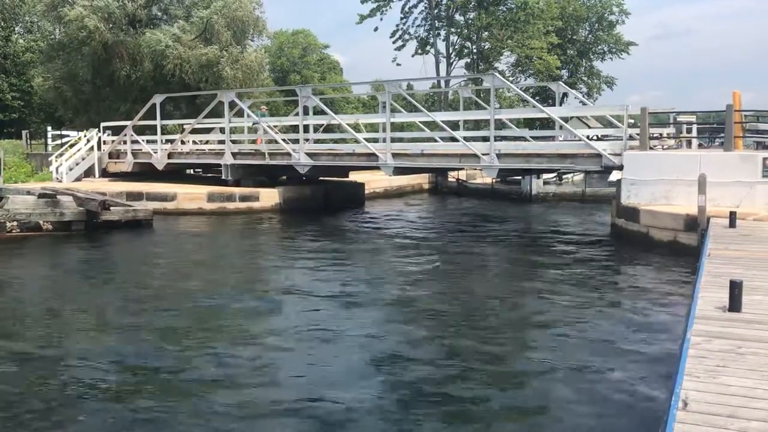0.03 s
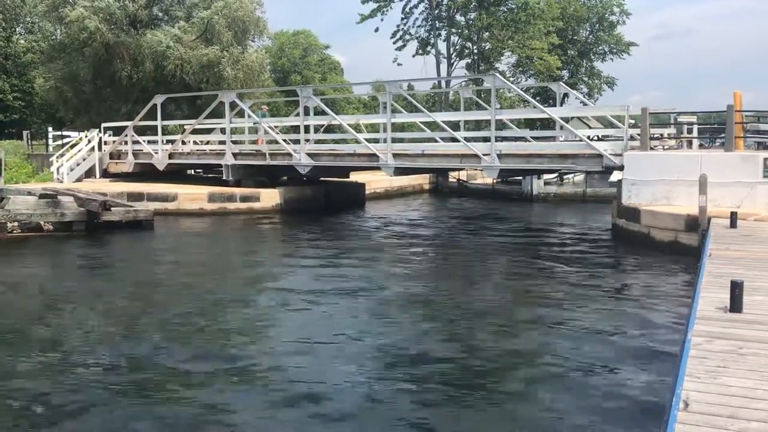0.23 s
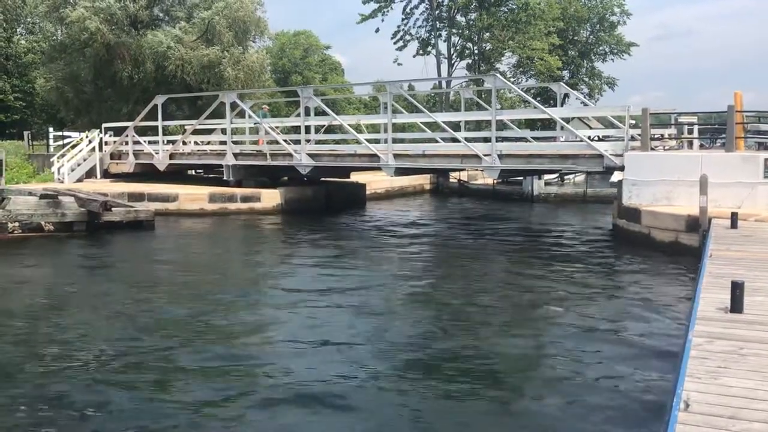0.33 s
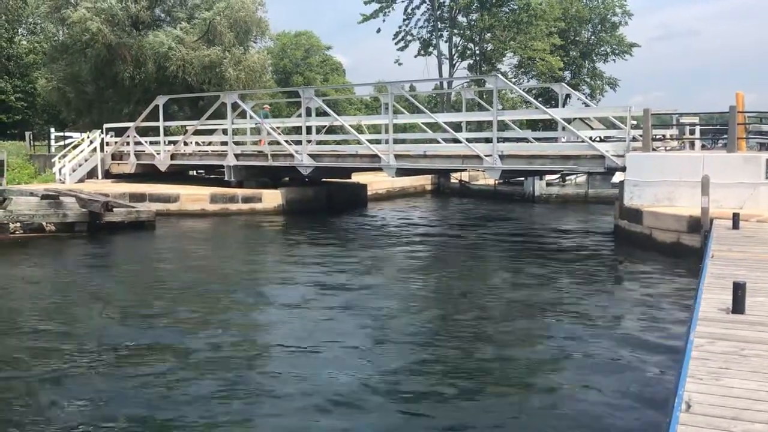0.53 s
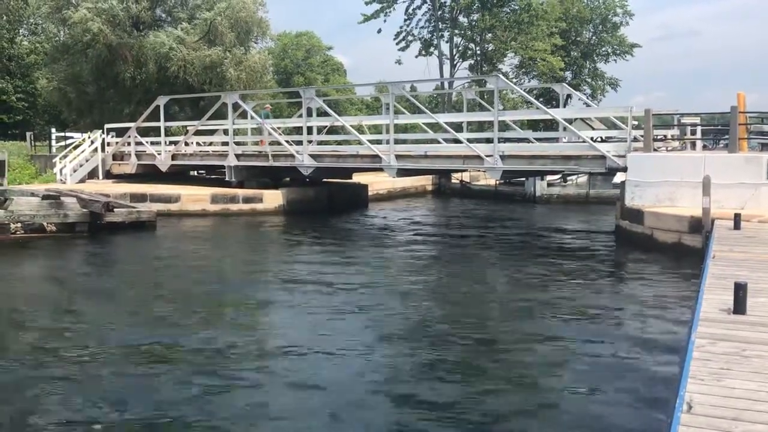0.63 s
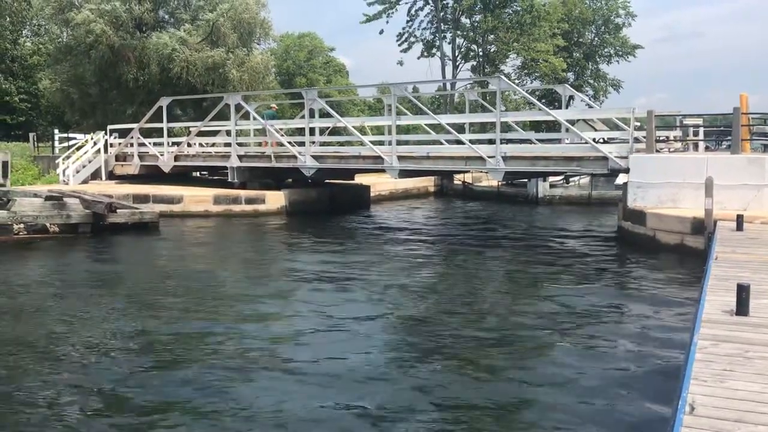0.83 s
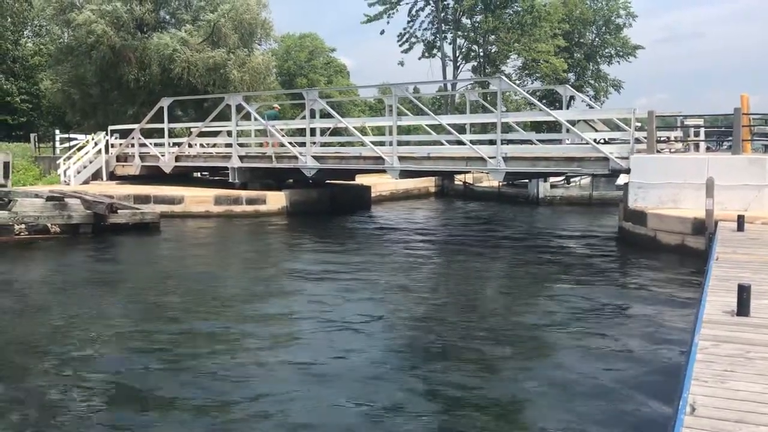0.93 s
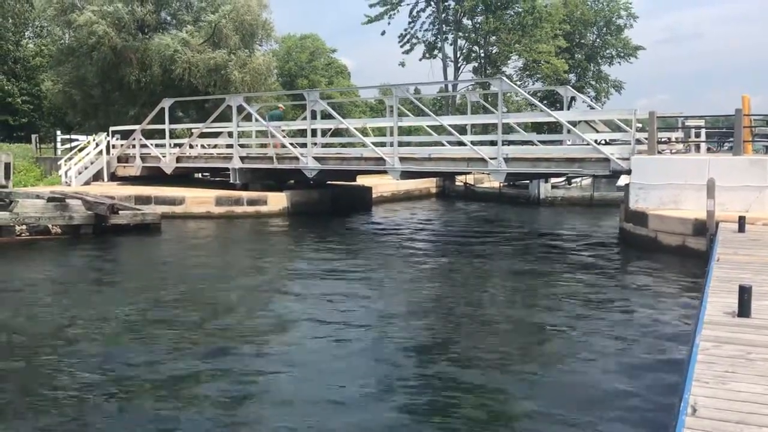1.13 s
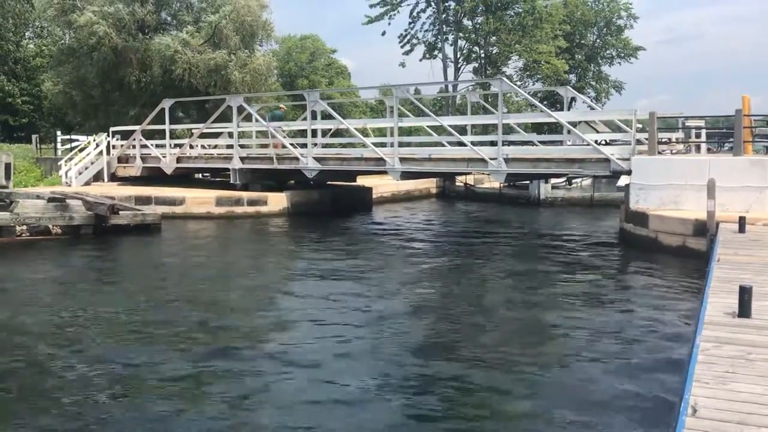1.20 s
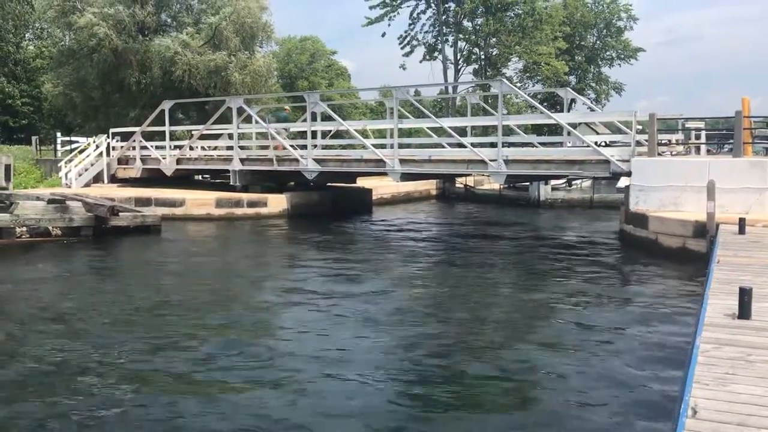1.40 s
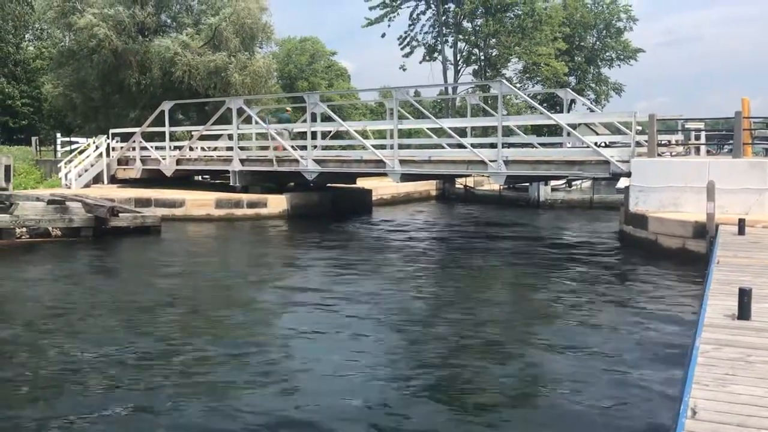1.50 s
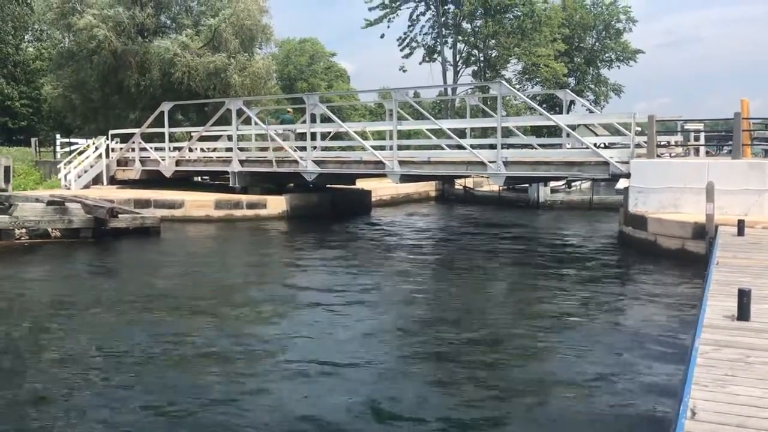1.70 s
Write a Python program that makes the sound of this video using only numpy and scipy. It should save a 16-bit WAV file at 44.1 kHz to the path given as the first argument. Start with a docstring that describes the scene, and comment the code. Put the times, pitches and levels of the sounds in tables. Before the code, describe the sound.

Steel bangs twice outdoors, ringing briefly, before far-off knocks and faint clinks.

```python
"""Bangs at a steel swing bridge

A small tap leads into a loud bang and a lighter, brighter rebound: each blow makes the steel ring at
many pitches at once (its "modes"). Two dull, distant knocks follow. Close by, a small metal piece
clinks, and something squeaks and ticks faintly. Light wind bumps the microphone over quiet open air."""
import sys
import numpy as np
from scipy import signal
from scipy.fft import irfft
from scipy.io import wavfile

SR = 44100
rng = np.random.default_rng(int(sys.argv[2]) if len(sys.argv) > 2 else 0)


def waveform_to_disk(signal):
    """Save audio, clipped to [-1, 1], as 16-bit WAV at the path in sys.argv[1]."""
    frames = np.transpose(np.atleast_2d(signal))
    scaled = np.clip(frames, -1, 1) * 32767
    samples = np.round(scaled).astype(np.int16)
    wavfile.write(sys.argv[1], SR, samples)


N = 77175
TIME = np.arange(N) / SR
FREQ = np.maximum(np.arange(N // 2 + 1) * SR / N, 1)

# The steel's dense ringing; t60 is the time a sound takes to fade by 60 dB.
# f/Hz, bang level/dB per Hz, rebound level/dB per Hz, t60/s
STEEL = [(90, -68, -85, 1.1), (165, -49, -68, 1.3), (260, -56, -71, 1.5), (440, -55, -74, .9),
         (620, -55, -69, .72), (780, -55, -66, .75), (1050, -50, -62, .7), (1450, -51, -58, .68),
         (1750, -51, -56, .5), (2150, -51, -53, .36), (2700, -56, -60, .34), (3400, -52, -59, .33),
         (5200, -63, -61, .28), (8500, -68, -68, .2), (11000, -74, -85, .19), (13000, -71, -86, .2),
         (16000, -80, -97, .19)]
BANG_COLUMN, REBOUND_COLUMN, T60_COLUMN = 1, 2, 3


def from_db(db):
    """Turn decibels into a factor to multiply by."""
    return 10 ** (np.asarray(db) / 20)


def rms_one(x):
    """Scale a signal so that its average strength (rms) is 1."""
    return x / np.sqrt(np.mean(x ** 2) + 1e-20)


def at_hz(table, hz, column=1):
    """Read a table at any pitch, blending between its rows."""
    table = np.array(table)
    return np.interp(np.log(hz), np.log(table[:, 0]), table[:, column])


def random_spectrum(gain):
    """Give each frequency its strength (gain, per root Hz) and a random phase."""
    return gain * np.exp(2j * np.pi * rng.random(len(FREQ))) * np.sqrt(N * SR / 2)


def noise(gain):
    """Noise whose tone is shaped by a gain for each frequency."""
    return irfft(random_spectrum(gain), N)


def narrow_noise(hz, width_hz):
    """Noise gathered around one pitch, with rms 1."""
    return rms_one(noise(1 / (1 + (2 * (FREQ - hz) / width_hz) ** 4)))


def keep_side(x, hz, side):
    """A gentle filter that keeps the "low" or the "high" side of a frequency."""
    return signal.sosfilt(signal.butter(2, hz, side, fs=SR, output="sos"), x + 1e-18)


def decay(start, t60):
    """Jump to 1 at the start time, then fade away."""
    out, first = np.zeros(N), int(start * SR)
    age = TIME[:min(N - first, int(2 * t60 * SR))]
    out[first:first + len(age)] = 1000 ** (-age / t60)
    return out


def rise(start, rise_s):
    """Climb smoothly from 0 towards 1."""
    return 1 - np.exp(-np.maximum(TIME - start, 0) / rise_s)


def swell(start, length):
    """Go up and back down in one rounded hump."""
    return np.sin(np.pi * np.clip((TIME - start) / length, 0, 1))


def mode(start, hz, t60):
    """One pure tone of struck metal, fading away."""
    age = TIME - int(start * SR) / SR
    return np.sin(2 * np.pi * (hz * age + rng.random())) * decay(start, t60)


def steel_blow(blow, bands, column):
    """One blow rings the steel's strong modes and the dense ones between them."""
    # The strongest modes: f/Hz, bang level/dB, rebound level/dB, t60/s
    strong_modes = [(595, -34, -50, .55), (998, -20, -44, .27), (1028, -16, -46, .09),
                    (1053, -21, -46, .25), (1129, -31, -44, .55), (1175, -33, -40, .8),
                    (1277, -28, -46, .45), (1402, -25, -43, .45), (1505, -28, -46, .45),
                    (1613, -35, -38, .6), (2038, -26, -31, .25), (2105, -34, -19, .14),
                    (2168, -27, -38, .26), (2226, -18, -38, .26), (2455, -29, -34, .33),
                    (3310, -21, -42, .09), (3425, -26, -36, .25), (4540, -36, -34, .3),
                    (5520, -39, -34, .25)]
    start, db, rise_s, tail_db = blow
    tones = sum(from_db(row[column]) * mode(start, row[0], row[T60_COLUMN]) for row in strong_modes)
    return from_db(db) * (dense_ring(bands, start, rise_s, tail_db) + tones * rise(start, rise_s=.005))


def mode_bunching(spacing_hz=45, depth_db=2.4):
    """The steel's modes crowd into peaks: an uneven gain across the frequencies."""
    smoother = signal.butter(2, SR / N / spacing_hz, output="sos")
    wiggle = rms_one(signal.sosfiltfilt(smoother, rng.standard_normal(len(FREQ)), padtype="even"))
    return rms_one(from_db(depth_db * np.clip(wiggle, -2, 2)))


def dense_bands(bunching, column):
    """Countless close modes blur into noise, split here into (centre pitch, steady sound) pairs."""
    edges = np.geomspace(70, 17000, 15)
    spectrum = random_spectrum(bunching * from_db(at_hz(STEEL, FREQ, column)))
    return [(np.sqrt(low * high), irfft(spectrum * (FREQ >= low) * (FREQ < high), N))
            for low, high in zip(edges, edges[1:])]


def dense_ring(bands, start, rise_s, tail_db):
    """In struck steel, low pitches build later and last longer; a quiet tail follows."""
    bass_rise_s = .018   # extra build-up time at 200 Hz, shorter for higher pitches
    tail_t60_s, half_tail_hz = .85, 9000   # the tail is half as long at this pitch
    out, first = np.zeros(N), int(start * SR)
    age = TIME[:N - first]
    for hz, band in bands:
        body = 1000 ** (-age / at_hz(STEEL, hz, T60_COLUMN))
        tail = from_db(tail_db) * 1000 ** (-age / tail_t60_s * (1 + hz / half_tail_hz))
        build = 1 - np.exp(-age / (rise_s + bass_rise_s * (200 / hz) ** 2))
        out[first:] += band[first:] * build * np.hypot(body, tail)
    return out


def cracks():
    """The first contact of each blow makes a short, bright burst of noise."""
    # The contacts: t/s, level/dB
    contacts = [(.2322, -15), (.3892, -35)]
    # Peaks in their tone: f/Hz, width/Hz, relative level/dB
    peaks = [(1800, 2200, -4), (3300, 900, -3), (8500, 7000, -5), (12700, 2600, -7)]
    bright = sum(from_db(db) * narrow_noise(hz, width) for hz, width, db in peaks)
    return bright * sum(from_db(db) * decay(t, t60=.04) * rise(t, rise_s=.0015) for t, db in contacts)


def tap(start=.1785, hz=1240):
    """A light touch before the bang rings one short tone and leaves a blurred tail."""
    ring = from_db(-29) * mode(start, hz, t60=.03)
    tail = from_db(-36) * narrow_noise(hz, width_hz=430) * decay(start, t60=.17)
    return (ring + tail) * rise(start, rise_s=.002)


def far_knocks(bands):
    """The same steel sound from far off: blurred, with less bass and less treble."""
    # The knocks: t/s, gain/dB, rise/s, treble cut/Hz, relative tail level/dB
    knocks = [(.699, -24.5, .012, 3800, -9), (.947, -16, .016, 5400, -9)]
    dull = sum(from_db(db) * keep_side(dense_ring(bands, t, rise_s, tail_db), hz, "low")
               for t, db, rise_s, hz, tail_db in knocks)
    return keep_side(dull, hz=560, side="high")


def clinks():
    """Each touch of the small metal piece is a click and a thin, high ring that shimmers away."""
    # The touches: t/s, click level/dB, gain of the lowest mode/dB, gain of the upper modes/dB
    touches = [(.752, -47, 0, -5), (.766, -39, -16, -5), (.777, -51, -22, 2), (.901, -44, -18, -6),
               (.913, -56, -13, -1), (.947, -62, -20, -8), (1.435, -64, -23, -19), (1.55, -64, -24, -19),
               (1.625, -60, -25, -15)]
    # The piece's modes: f/Hz, level/dB, t60/s
    piece_modes = [(5582, -38, .35), (6239, -44, .17), (9114, -57, .08), (10960, -47, .21),
                   (11606, -64, .12)]
    click_shape = sum(from_db(db) * decay(t, t60=.035) for t, db, _, _ in touches)
    out = narrow_noise(hz=8000, width_hz=4500) * click_shape
    for k, (hz, db, t60) in enumerate(piece_modes):
        shimmer_power = 0
        for t, _, lowest_db, upper_db in touches:
            gain = from_db(db + (upper_db if k else lowest_db))
            out += gain * mode(t, hz, t60)
            shimmer_power += (gain * from_db(-16) * decay(t, t60=.8)) ** 2
        out += narrow_noise(hz, width_hz=80) * np.sqrt(shimmer_power)
    return out


def squeaks():
    """Something squeaks faintly, and a brief knock sounds late: short swells of noise, each around one pitch."""
    # The squeaks, and the brief late knock at 1.69 s: t/s, length/s, f/Hz, width/Hz, level/dB
    events = [(.885, .05, 2360, 40, -49), (.852, .02, 2700, 1100, -47), (1.2, .035, 14300, 900, -65),
              (1.29, .04, 3120, 200, -58), (1.615, .06, 11300, 1100, -68), (1.69, .022, 1900, 600, -50),
              (.03, .1, 6200, 1200, -64)]
    return sum(from_db(db) * narrow_noise(hz, width) * swell(t, length)
               for t, length, hz, width, db in events)


def ticks():
    """An uneven run of faint, dry ticks, each a tiny burst of hiss."""
    # The ticks: t/s, level/dB
    events = [(1.128, -49), (1.144, -49), (1.1815, -48), (1.201, -51), (1.2304, -49), (1.256, -51),
              (1.337, -50), (1.361, -51), (1.425, -51), (1.4848, -50), (1.5138, -49), (1.5347, -51),
              (1.562, -50), (1.631, -51), (1.6918, -51), (1.7348, -46)]
    # Their tone: f/Hz, relative level/dB per Hz
    tone = [(500, -12), (2000, -3), (3400, 0), (5500, 0), (9000, -11), (16000, -26)]
    hiss = rms_one(noise(from_db(at_hz(tone, FREQ))))
    return hiss * sum(from_db(db) * decay(t, t60=.028) for t, db in events)


def wind_bumps():
    """Puffs of wind hit the microphone and make soft, low thumps."""
    # The puffs: t/s, length/s, level/dB, upper edge/Hz
    puffs = [(.128, .04, -36, 100), (.830, .018, -38, 330), (.84, .055, -33, 130), (1.2, .08, -41, 55),
             (1.32, .08, -38, 105), (1.4, .15, -44, 85), (1.69, .08, -38, 65)]
    rumble = keep_side(rng.standard_normal(N), hz=48, side="high")
    rumble = keep_side(rumble, hz=450, side="low")
    return sum(from_db(db) * swell(t, length) * rms_one(keep_side(rumble, hz, "low"))
               for t, length, db, hz in puffs)


def open_air(flicker_db=1.5):
    """Water, leaves and light wind blend into one quiet rush that flickers slightly."""
    # The tone of the rush: f/Hz, level/dB per Hz
    tone = [(20, -96), (52, -66), (110, -73), (250, -80), (500, -88), (1100, -88), (2200, -95), (4000, -99),
            (6300, -101), (10000, -113), (16000, -119)]
    # Its slow rise and fall: t/s, gain/dB
    drift = [(0, -2), (.2, 0), (.7, 1.5), (1.1, 2), (1.35, 1.5), (1.6, -1), (1.75, 0)]
    drift_db = np.interp(TIME, *np.transpose(drift))
    flicker = rms_one(noise(1 / (1 + (FREQ / 30) ** 2)))   # mostly slower than 30 Hz
    return noise(from_db(at_hz(tone, FREQ))) * from_db(drift_db + flicker_db * flicker)


def scene():
    """All the sounds add up at one microphone."""
    # The main blow on the steel: t/s, gain/dB, rise/s, relative tail level/dB
    bang = (.2314, 0, .002, -19)
    # The lighter second blow: t/s, gain/dB, rise/s, relative tail level/dB
    rebound = (.389, 0, .0035, -18)
    bunching = mode_bunching()
    heavy, light = dense_bands(bunching, BANG_COLUMN), dense_bands(bunching, REBOUND_COLUMN)
    steel = tap() + cracks()
    steel += steel_blow(bang, heavy, BANG_COLUMN) + steel_blow(rebound, light, REBOUND_COLUMN)
    return (steel + far_knocks(heavy) + clinks() + squeaks() + ticks() + wind_bumps() + open_air())[None]


def record(dry):
    """A steep filter removes the very highest treble."""
    cutoff_hz = 15900
    return signal.sosfilt(signal.ellip(10, .2, 80, cutoff_hz, fs=SR, output="sos"), dry)


dry = scene()
out = record(dry)
waveform_to_disk(out)
```